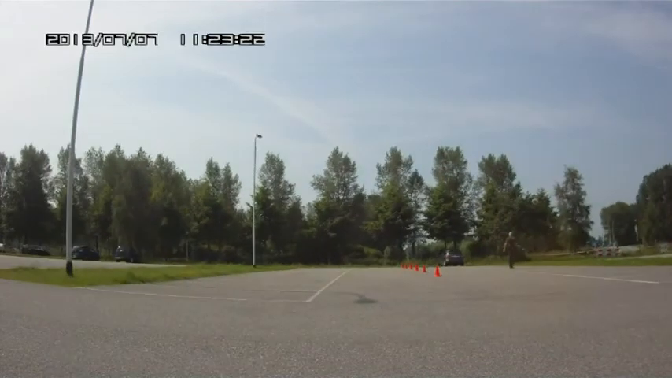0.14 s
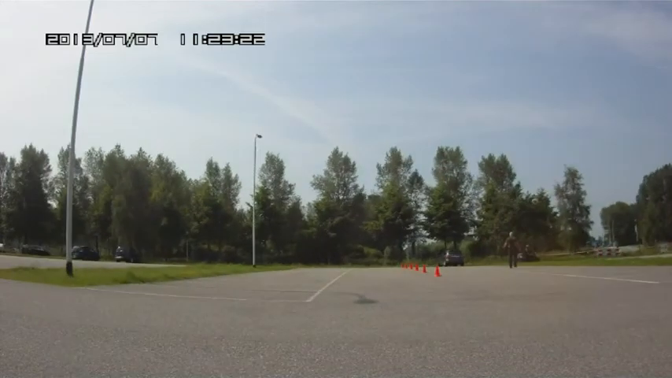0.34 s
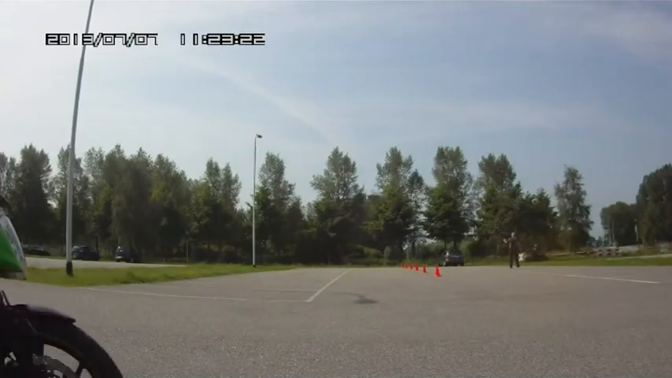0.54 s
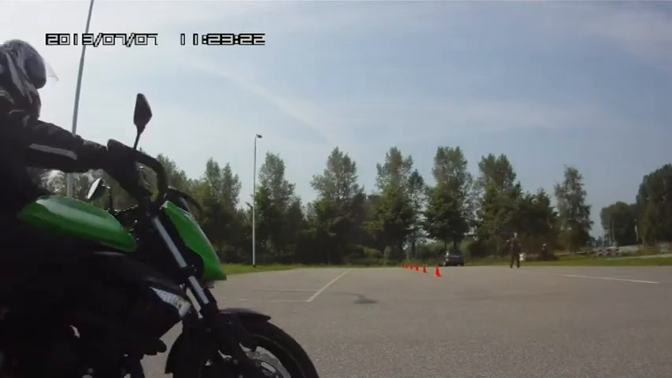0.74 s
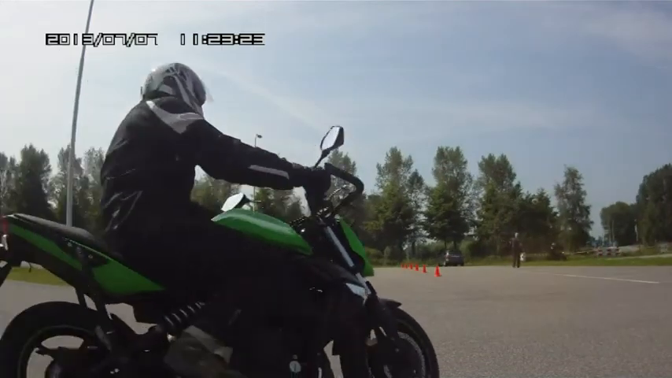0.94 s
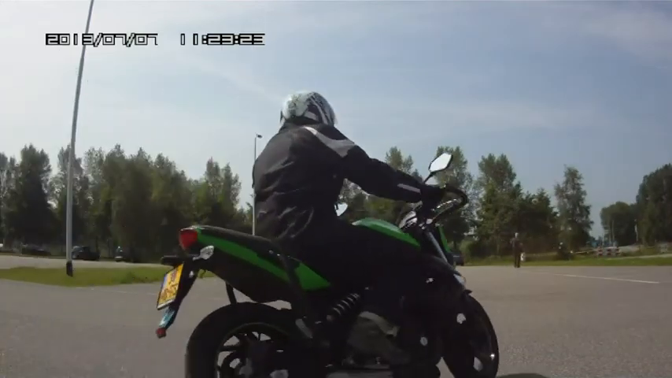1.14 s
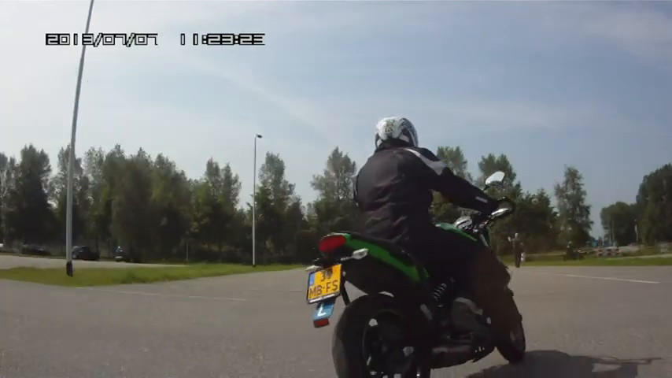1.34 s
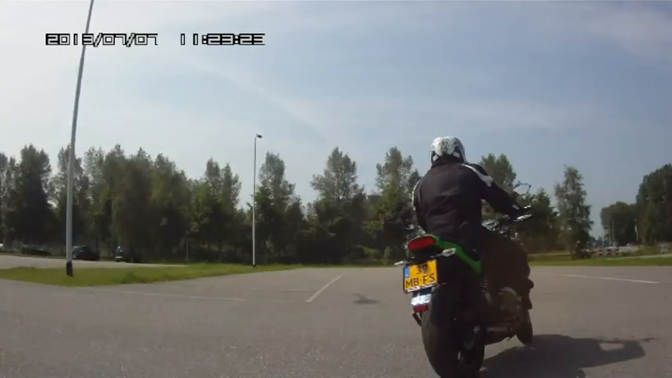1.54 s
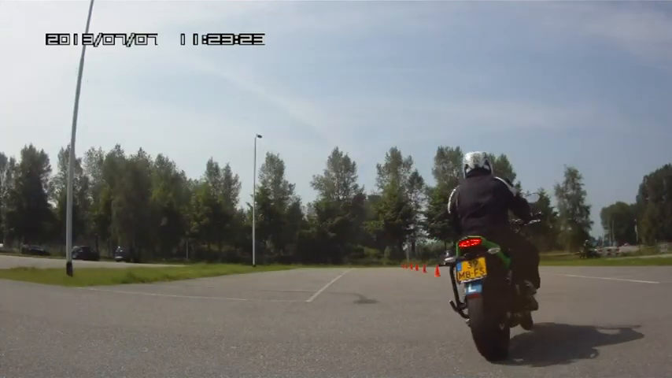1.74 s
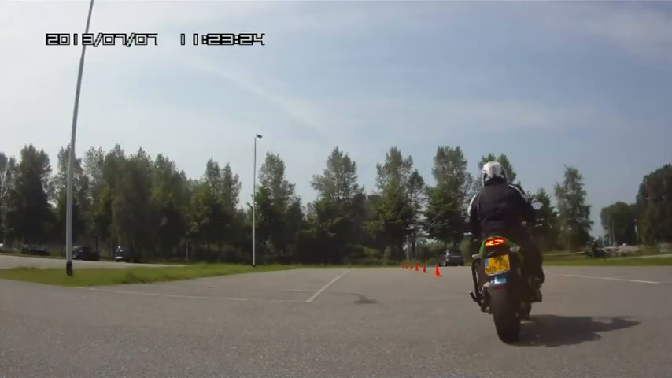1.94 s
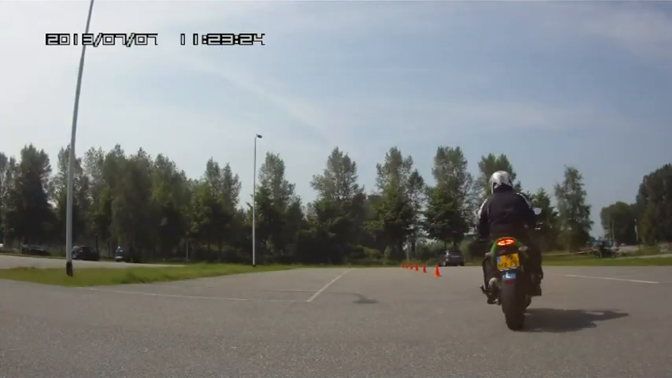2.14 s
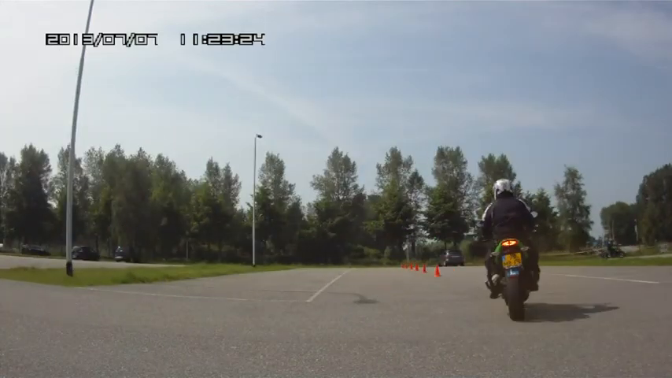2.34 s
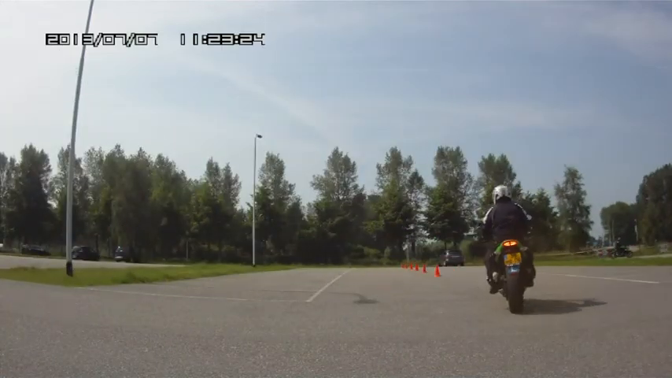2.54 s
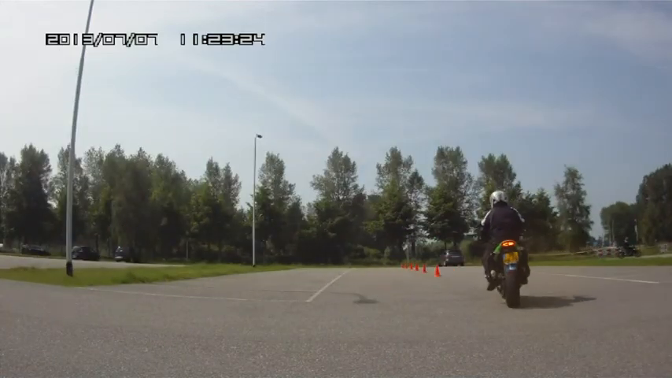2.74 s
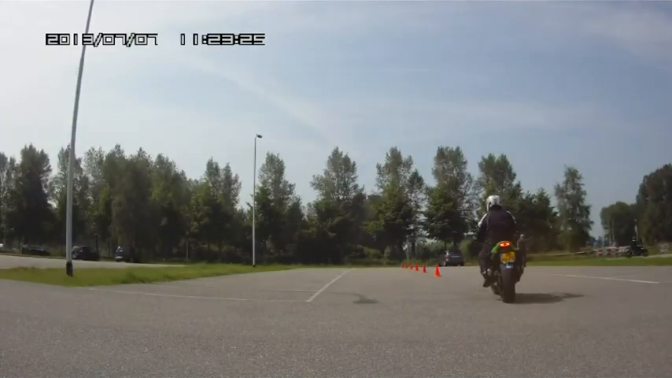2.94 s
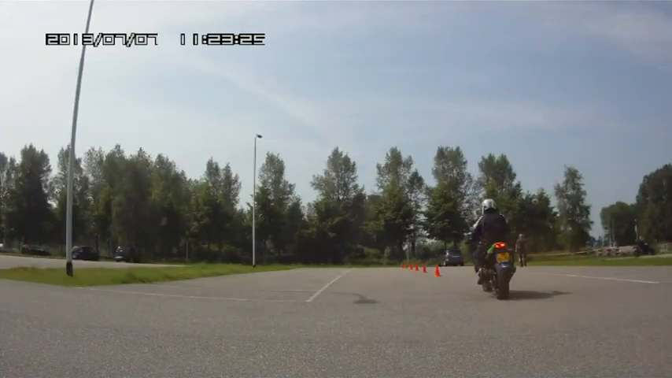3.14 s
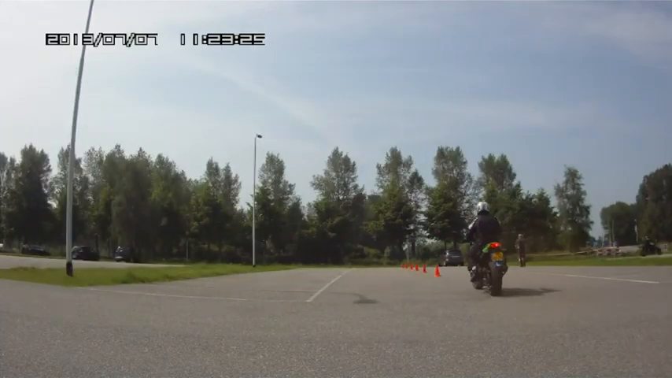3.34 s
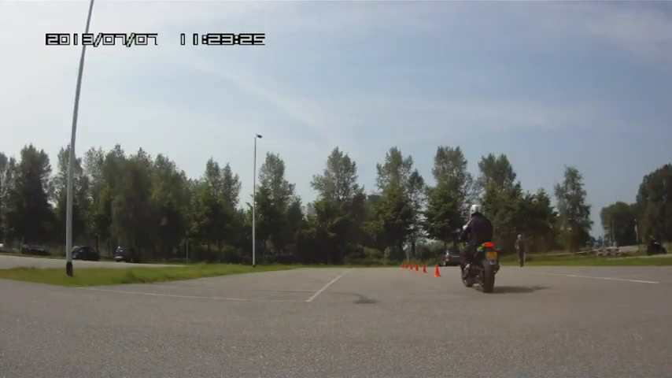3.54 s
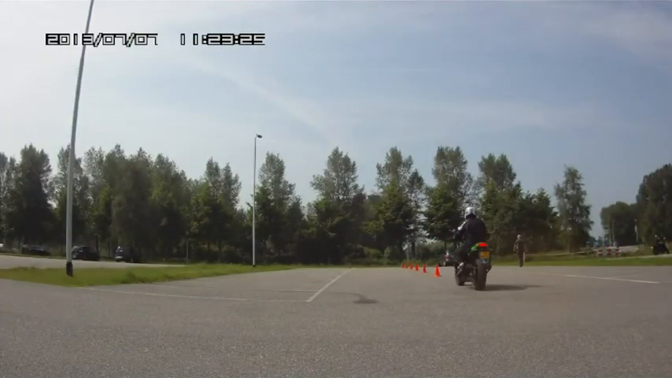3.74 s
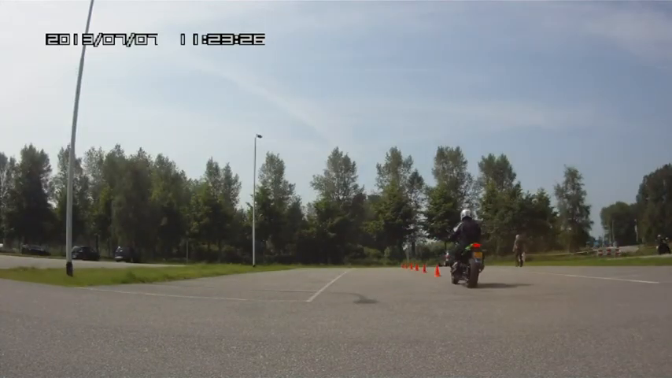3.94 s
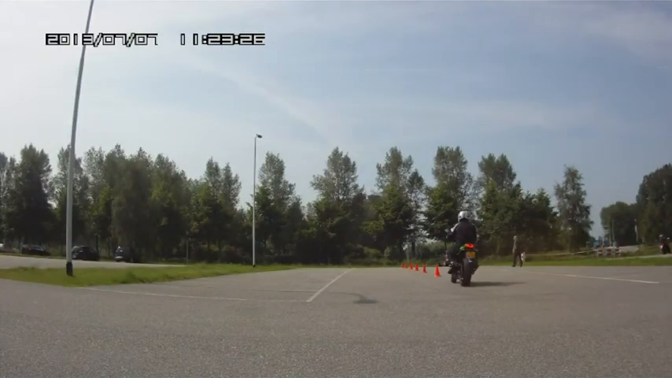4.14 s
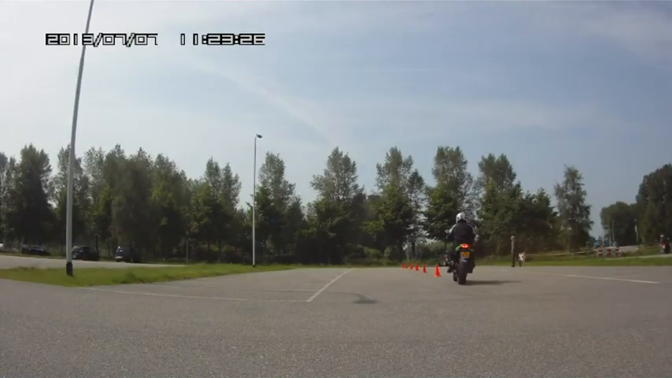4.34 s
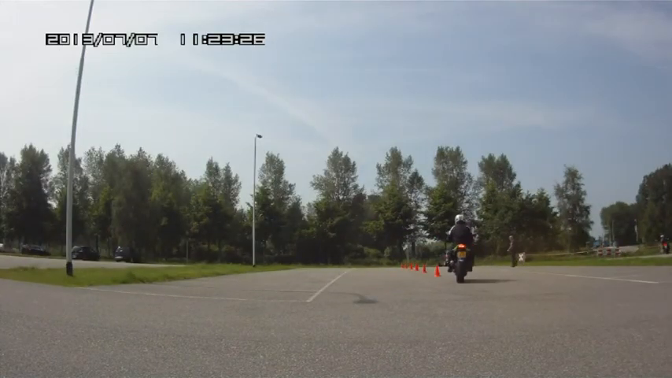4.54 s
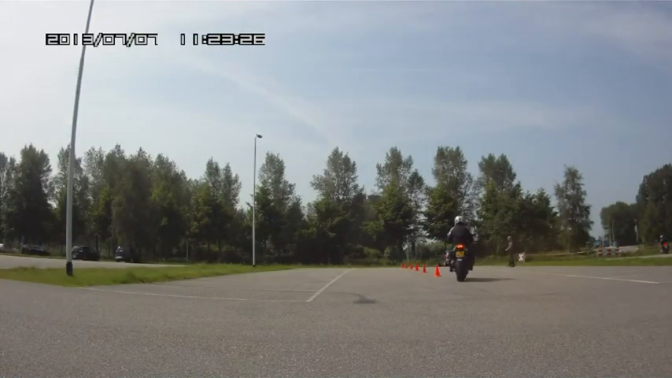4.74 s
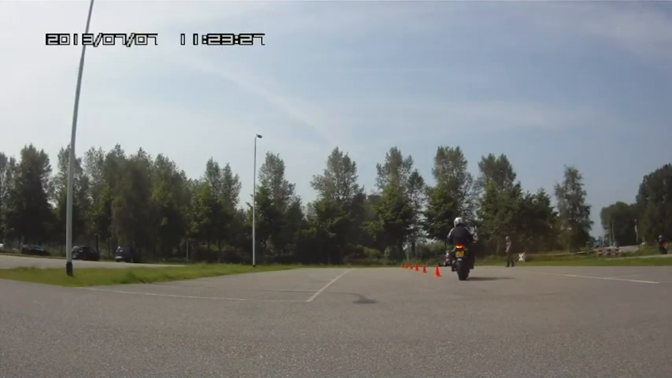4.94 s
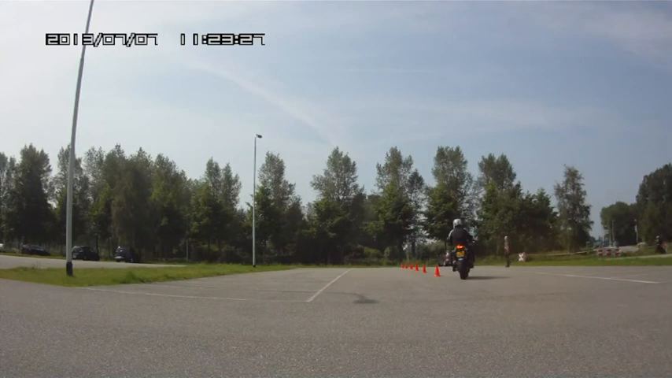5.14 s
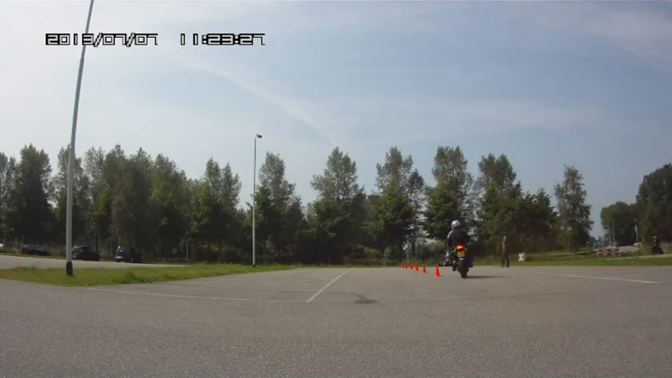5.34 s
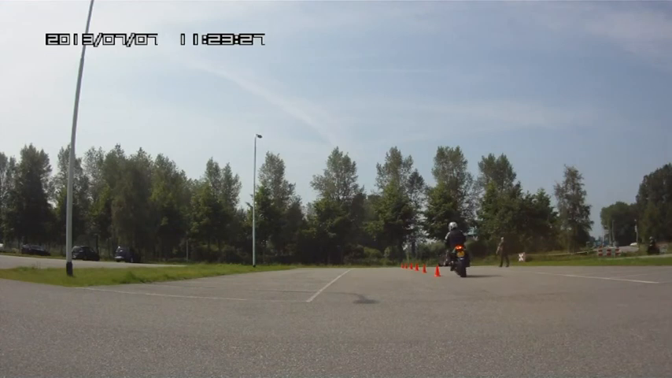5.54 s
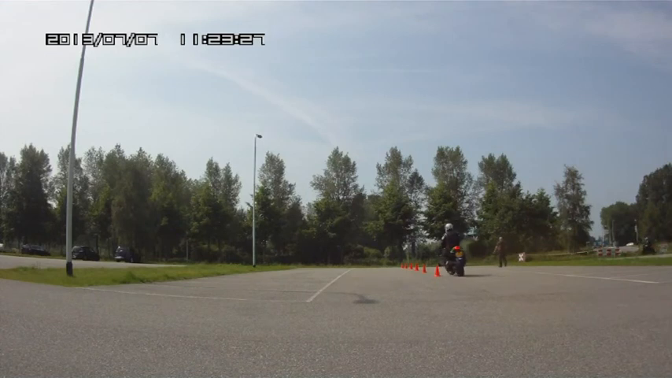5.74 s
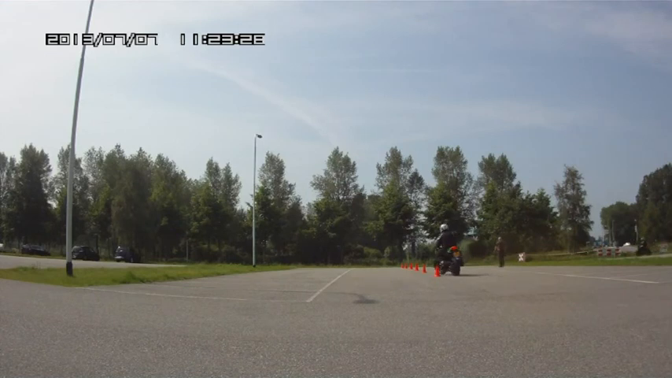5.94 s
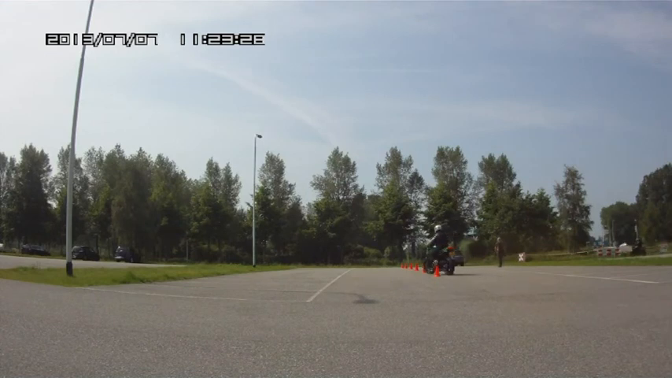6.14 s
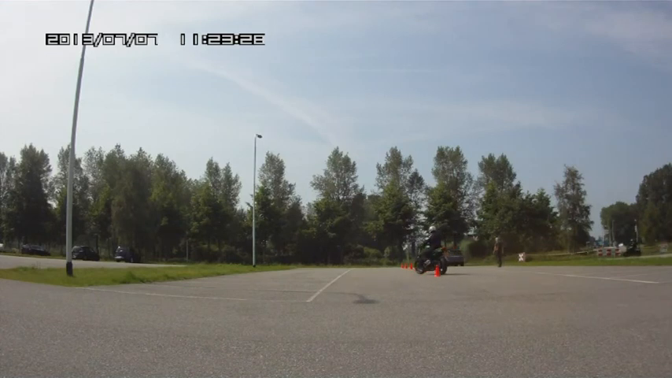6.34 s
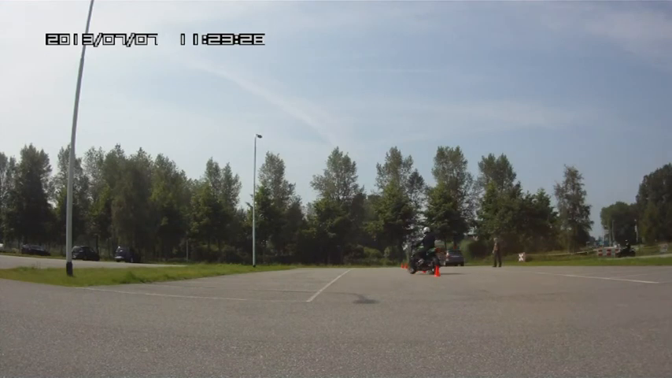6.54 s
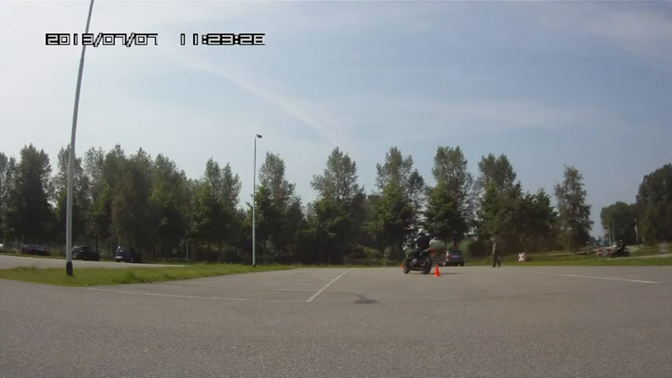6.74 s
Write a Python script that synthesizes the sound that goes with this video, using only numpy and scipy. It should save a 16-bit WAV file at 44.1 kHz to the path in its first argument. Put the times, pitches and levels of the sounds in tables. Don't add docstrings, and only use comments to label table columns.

```python
import sys
import numpy as np
from scipy import signal
from scipy.fft import rfft, irfft
from scipy.io import wavfile
from scipy.ndimage import uniform_filter1d

SR = 44100
rng = np.random.default_rng(int(sys.argv[2]) if len(sys.argv) > 2 else 0)


def master_out(mix):
    frames = np.transpose(np.atleast_2d(mix))
    ceiling = np.clip(frames, -1, 1)
    pcm = np.round(ceiling * 32767).astype(np.int16)
    wavfile.write(sys.argv[1], SR, pcm)


def natural_amplitude(level_db):
    exponent = np.asarray(level_db, float) / 20
    return 10 ** exponent


N = 303408

COASTS_S, COAST_S = 5.6, 0.2
REVS_START_S, REVS_END_S, REVS_EDGE_S = 4.3, 5.35, 0.1
FIRING_AT = (0.14, 0.2442)


def curves(table):
    s, *columns = np.transpose(table)
    return [np.interp(np.arange(N) / SR, s, column) for column in columns]


def ramp(at_s, over_s):
    return 1 / (1 + np.exp(-(np.arange(N) / SR - at_s) / over_s))


def high_revs(end_s=REVS_END_S):
    return ramp(REVS_START_S, REVS_EDGE_S) - ramp(end_s, REVS_EDGE_S)


def walk(rate_hz):
    hold = int(SR / rate_hz)
    steps = np.repeat(rng.standard_normal(N // hold + 1), hold)
    return uniform_filter1d(uniform_filter1d(steps, hold), hold)[:N]


def level(x, db=0):
    return x * natural_amplitude(db) / np.sqrt(np.mean(x ** 2))


def band(x, hz, width_hz):
    return signal.lfilter(*signal.iirpeak(hz, hz / width_hz, fs=SR), x)


def cut(x, hz, kind, order=2):
    return signal.sosfilt(signal.butter(order, hz, kind, fs=SR, output="sos"), x)


def body(x, modes, sign=-1, patchy_db=0):
    out = 0
    for k, (hz, width_hz, db) in enumerate(modes):
        gain = sign ** k * natural_amplitude(db + patchy_db * walk(6.94))
        out = out + gain * band(x, hz, width_hz)
    return out


def noise(points):
    hz, db = np.transpose(points)
    f = np.arange(N // 2 + 1) * SR / N + 1e-3
    shape = natural_amplitude(np.interp(np.log(f), np.log(hz), db))
    return level(irfft(rfft(rng.standard_normal(N)) * shape, N))


def tone(table, wobble_db):
    hz, db = curves(table)
    return natural_amplitude(db + wobble_db * walk(11)) * np.sqrt(2) * np.sin(2 * np.pi * np.cumsum(hz) / SR)


def blows(turns, at, second_db, scatter_db, jitter_s, early_s=0):
    count = int(turns[-1]) + 1
    due = (np.arange(count)[:, None] + np.cumsum(at)).ravel()
    late, strength = rng.standard_normal((2 * count, 2)).T
    sample = np.interp(due, turns, np.arange(N), right=2 * N)
    where = (sample + SR * (jitter_s * late - early_s)).astype(int)
    heard = (where >= 0) & (where < N)
    second = np.tile([0, 1], count)[heard] * (second_db + np.zeros(N))[where[heard]]
    out = np.zeros(N)
    out[where[heard]] = natural_amplitude(second + scatter_db * strength[heard])
    return out


def puffs(clicks, decay_s, steady):
    swell = signal.lfilter([1], [1, -np.exp(-1 / (decay_s * SR))], clicks)
    return (level(swell) + steady) * rng.standard_normal(N)


# start_s [s], speed_hz [engine cycles per second]
ENGINE_SPEED = [(0.0, 15.462), (0.107, 15.267), (0.625, 15.604), (1.767, 15.135), (2.01, 15.308),
                (2.353, 16.291), (2.513, 19.714), (2.661, 21.359), (3.439, 20.801), (3.745, 20.153),
                (4.169, 21.16), (4.41, 22.983), (4.679, 23.997), (5.009, 23.909), (5.285, 23.252),
                (6.045, 17.103), (6.669, 17.453), (6.88, 19.272)]


def crank():
    turns = np.cumsum(curves(ENGINE_SPEED)[0]) / SR
    return turns + 0.004 * ramp(COASTS_S, COAST_S) * walk(5)


# start_s [s], opening [0-1]
THROTTLE_HAND = [
    (0, 0.02),
    (2.1, 0.24),
    (2.4, 0.56),
    (2.7, 0.73),
    (4.2, 0.78),
    (4.6, 1),
    (5.3, 0.97),
    (5.75, 0.6),
    (6.1, 0.57),
    (6.88, 0.52),
]


def throttle():
    return curves(THROTTLE_HAND)[0]


def distance_db():
    passes_s, nearest_m, roll_m_s = 0.93, 1.812, 1.847
    pulls_s, pull_m_s2 = 5.35, 0.51
    s = np.arange(N) / SR
    along_m = roll_m_s * (s - passes_s) + pull_m_s2 / 2 * np.maximum(s - pulls_s, 0) ** 2
    return -20 * np.log10(np.hypot(along_m, nearest_m) / nearest_m)


# start_s [s], level_db [dB]
FIRING_STRENGTH = [(0, -0.5), (.3, -0.5), (.6, 0), (1.1, 0), (1.5, -2), (1.95, -0.5), (2.2, 1), (2.56, 1),
                   (2.9, -1), (3.6, 1), (4.3, 3), (5.0, 1.5), (5.4, 1.5), (5.7, 3.5), (5.86, 6), (6.1, 5.5),
                   (6.4, 4.5), (6.63, 6.5), (6.88, 7)]


def loudness_db(nearest_db, loss_share, throttle_db=0, firing_share=0):
    moved = nearest_db + loss_share * distance_db() + throttle_db * throttle()
    return moved + firing_share * curves(FIRING_STRENGTH)[0]


def thump(turns):
    intake = np.minimum(1.8 * throttle() ** 2, 0.96)
    intake = np.maximum(intake, 0.95 * ramp(COASTS_S, COAST_S))
    low = blows(turns, FIRING_AT, second_db=0.5, scatter_db=0.5, jitter_s=0.00045)
    silencer = band(band(low, 83.1, 55.6), 67.4, 123) + natural_amplitude(-10.0) * band(low, 65.4, 25)
    silencer = cut(cut(silencer, 127.2, "low", order=6), 58.0, "high", order=2)
    surge = level(band(band(low, 21.3, 13), 21.3, 13), -10.5)
    gulps = blows(turns, (.4403, .2425), second_db=-2.5, scatter_db=0.5, jitter_s=0.0001, early_s=.0187)
    boom = cut(cut(band(gulps, 98.4, 21), 70.3, "high", order=4), 135, "low", order=6)
    mix = (1 - intake) * level(silencer) - intake * level(boom) + surge
    hunt_db = 1.5 * ramp(COASTS_S, COAST_S) * walk(12)
    return mix * natural_amplitude(loudness_db(-22.5, 1.6432, 3.5, 1.03) + hunt_db)


# pitch_hz [Hz], width_hz [Hz], level_db [dB]
BARK_MODES = [(193.4, 123, 21), (227.6, 44, 12), (278, 37, 10.5), (330, 35, -2)]


def bark(turns):
    opening, revs = throttle(), high_revs()
    mid = blows(turns, (.335, .245), second_db=-11.0 + 1.9 * revs, scatter_db=1.0, jitter_s=.0001,
                early_s=.007)
    pipe_echo_s, pipe_echo_db = 0.00911, -1.5 - 2.7 * opening - 2.5 * revs
    mid = mid + natural_amplitude(pipe_echo_db) * np.roll(mid, int(pipe_echo_s * SR))
    clean = -level(body(mid, BARK_MODES, sign=1))
    gas = (.65 - .5 * opening) * level(body(puffs(mid, .015, .6), BARK_MODES, sign=1))
    mix = cut(cut(clean + gas, 156, "high", order=4), 425, "low", order=4)
    return mix * natural_amplitude(loudness_db(-44, 1.36, 14, 0.2))


def idle_ring(turns):
    intake = np.minimum(1.8 * throttle() ** 2, 0.96)
    intake = np.maximum(intake, 0.95 * ramp(COASTS_S, COAST_S))
    ring = blows(turns, (.275, .312), second_db=5.5, scatter_db=1.5, jitter_s=.00008)
    knock = blows(turns, (.294, .244), second_db=3, scatter_db=2.5, jitter_s=.0001)
    return (1 - intake) * (0.49 * level(band(ring, 496, 15)) + 0.15 * level(band(knock, 701, 47)))


def crack(turns):
    snap = blows(turns, (.105, .305), second_db=-7, scatter_db=1.5, jitter_s=.0002)
    strength = 0.55 * throttle() ** 2 * (1 - .93 * ramp(4.2, 0.14))
    return strength * level(cut(band(snap, 660, 300), 770, "low", order=8))


# pitch_hz [Hz], width_hz [Hz], level_db [dB]
PIPE_MODES = [(493, 17, 6), (558, 87, -12.5), (683.7, 22, -11.5)]
# pitch_hz [Hz], width_hz [Hz], level_db [dB]
GAS_MODES = [(461, 80, -8), (488.5, 18.3, 0), (551.6, 31, -7), (695, 48.6, -8.5), (756, 85, -15)]


def tail_pipe(turns):
    opening = throttle()
    top = blows(turns, (.0239, .2458), second_db=1.5 - 8 * high_revs(), scatter_db=0.3, jitter_s=.00004,
                early_s=-.0055)
    clean = opening * level(body(top, PIPE_MODES)) + crack(turns) + idle_ring(turns)
    gas = (.85 - .73 * opening) * level(body(puffs(top, .02, 1.1), GAS_MODES))
    mix = cut(cut(clean + gas, 400, "high"), 830, "low", order=4)
    return mix * natural_amplitude(loudness_db(-44, 1.31, 17.5, 0.53))


# pitch_hz [Hz], width_hz [Hz], level_db [dB]
CASING_MODES = [(830, 310, 18.7), (1114, 120, 5.2), (1177, 300, 15.8), (1397, 185, 21.1), (1563, 138, 20)]
# pitch_hz [Hz], width_hz [Hz], level_db [dB]
VALVE_MODES = [(2048, 38, 0), (2330, 90, 2), (2565, 110, 2.5), (2840, 380, -3), (3300, 220, 1.5),
               (3930, 210, -1), (4300, 170, -1), (5250, 1100, -11)]


def clatter(turns):
    hidden = ramp(1.12, 0.14)
    clicks = blows(turns, FIRING_AT, second_db=1.5, scatter_db=1.5, jitter_s=.001)
    casing = body(puffs(clicks, .012, 2.0), CASING_MODES, patchy_db=1.5) * natural_amplitude(1.2 * walk(40))
    valves = body(puffs(clicks, .012, 2.2), VALVE_MODES, patchy_db=1.0) * natural_amplitude(0.67 * walk(45))
    casing = level(cut(casing, 1920, "low", order=4)) * natural_amplitude(loudness_db(-53, 1) - 11 * hidden)
    valves = level(cut(valves, 2000, "high")) * natural_amplitude(loudness_db(-62.5, 1) - 9.5 * hidden)
    return casing + valves


# start_s [s], pitch_hz [Hz], level_db [dB]
COVER_SONG = [(0, 1366, -62), (.15, 1360, -56), (.3, 1329, -62), (.46, 1320, -70), (.6, 1390, -56.5),
              (.76, 1367, -59), (.84, 1328, -51), (.93, 1310, -56), (1.1, 1338, -62.5), (1.45, 1360, -64.5),
              (1.85, 1380, -76), (3.0, 1398, -78), (3.5, 1386, -76), (4.1, 1397, -77), (4.25, 1190, -84),
              (4.5, 1186, -79), (5.0, 1190, -80), (5.4, 1190, -90)]


def cover():
    width_hz = 115
    hz, db = curves(COVER_SONG)
    shake = [level(cut(rng.standard_normal(N), width_hz / 2, "low")) for _ in range(2)]
    phase = 2 * np.pi * np.cumsum(hz) / SR
    return natural_amplitude(db) * (shake[0] * np.cos(phase) + shake[1] * np.sin(phase))


def teeth(turns):
    contacts_per_cycle, revs_db = 28, 6
    db = loudness_db(-70, .85, 17) + 2.2 * walk(9)
    db = db + revs_db * high_revs(REVS_END_S - REVS_EDGE_S)
    return natural_amplitude(db) * np.sqrt(2) * np.sin(2 * np.pi * (contacts_per_cycle * turns + .09 * walk(18)))


# pitch_hz [Hz], level_db [dB per Hz]
TRAFFIC_HUM = [(15, -35), (30, -29), (60, 7), (120, 0.5), (250, -11.5), (500, -6), (750, -28), (1000, -35),
               (1500, -37), (2500, -65)]


def open_air():
    wind = cut(cut(rng.standard_normal(N), 60, "low", order=4), 18, "high") * natural_amplitude(1.4 * walk(3))
    hum = noise(TRAFFIC_HUM) * natural_amplitude(.8 * walk(1.5))
    return level(wind, -50.5) + level(hum, -48.5)


# start_s [s], pitch_hz [Hz], level_db [dB]
FAR_ENGINE = [(0, 65, -60), (2.7, 65, -52), (3.6, 65, -48), (4.2, 65, -49), (4.7, 66, -49),
              (5.55, 66.5, -50), (5.85, 67, -42), (6.1, 68, -43), (6.22, 68, -60), (6.5, 68, -60),
              (6.6, 68.5, -39), (6.88, 70, -40)]


def far_engine():
    return tone(FAR_ENGINE, wobble_db=3.0)


# start_s [s], level_db [peak dB]
PIPE_SPITS = [
    (.810, -42),
    (.876, -33),
    (.939, -31),
    (1.003, -33),
    (1.067, -41),
    (1.130, -45),
]


def spits():
    out = np.zeros(N)
    s = np.arange(int(.05 * SR)) / SR
    for at_s, db in PIPE_SPITS:
        burst = rng.standard_normal(len(s)) * np.exp(-s / .004)
        burst = band(band(burst, 670, 260), 670, 300)
        start = int(at_s * SR)
        out[start:start + len(s)] += natural_amplitude(db) * burst / np.max(np.abs(burst))
    return cut(out, 820, "low", order=4)


# start_s [s], pitch_hz [Hz], level_db [dB]
BIRD_CALL = [
    (4.70, 700, -85),
    (4.72, 725, -62),
    (4.76, 800, -60),
    (4.79, 862, -59),
    (4.812, 872, -60),
    (4.83, 818, -62),
    (4.86, 800, -64),
    (4.885, 795, -88),
]


def bird():
    return tone(BIRD_CALL, wobble_db=0)


def echoes(bike):
    s = np.arange(SR // 2) / SR
    tail = rng.standard_normal(len(s)) * np.exp(-np.log(1000) * s / .35) * (s > .015)
    return natural_amplitude(-21) * signal.fftconvolve(bike, tail / np.sqrt(np.sum(tail ** 2)))[:N]


def scene():
    turns = crank()
    exhaust = thump(turns) + bark(turns) + tail_pipe(turns)
    bike = exhaust + clatter(turns) + cover() + teeth(turns) + spits()
    return (bike + echoes(bike) + open_air() + far_engine() + bird())[None]


# pitch_hz [Hz], level_db [dB per Hz]
AMP_HISS = [(800, 3), (1500, -2.5), (2500, -3), (5000, -4), (9000, -3.5), (15300, -2.5)]
# pitch_hz [Hz], level_db [dB]
CLOCK_WHINE = [(5200, -95), (6475, -91), (6525, -87), (7812, -89), (9100, -90)]


def electronics():
    s = np.arange(N) / SR
    whine = sum(natural_amplitude(db) * np.sqrt(2) * np.sin(2 * np.pi * hz * s) for hz, db in CLOCK_WHINE)
    return level(noise(AMP_HISS), -64) + whine


def roll_off(x):
    return signal.sosfilt(signal.butter(12, 15310, fs=SR, output="sos"), x)


def record(dry):
    fade = np.minimum((N - np.arange(N)) / (.006 * SR), 1)
    mix = dry * fade + electronics()
    return roll_off(mix)


dry = scene()
out = record(dry)
master_out(out)
```